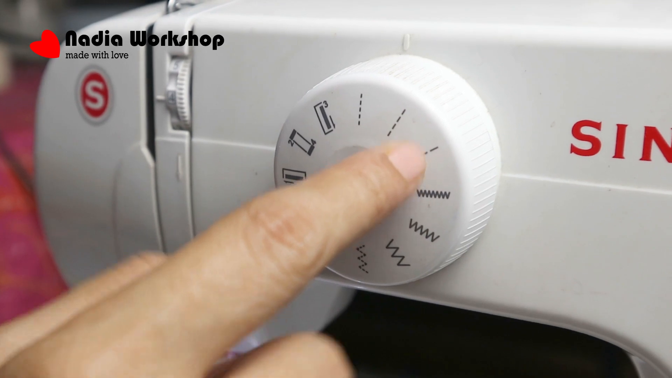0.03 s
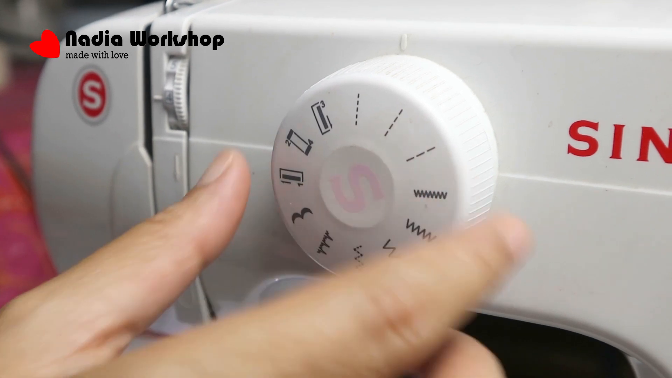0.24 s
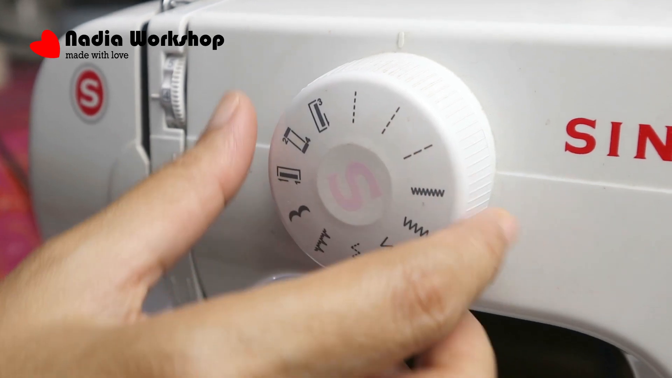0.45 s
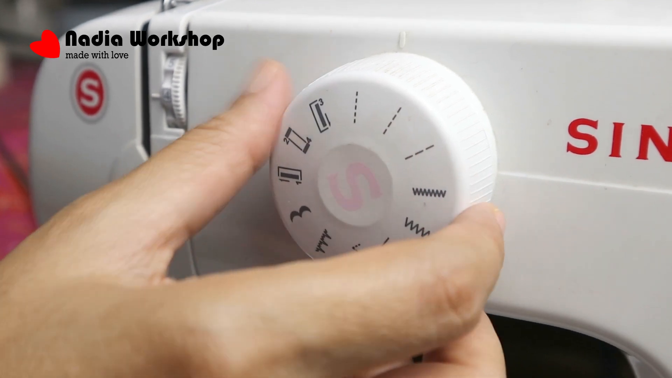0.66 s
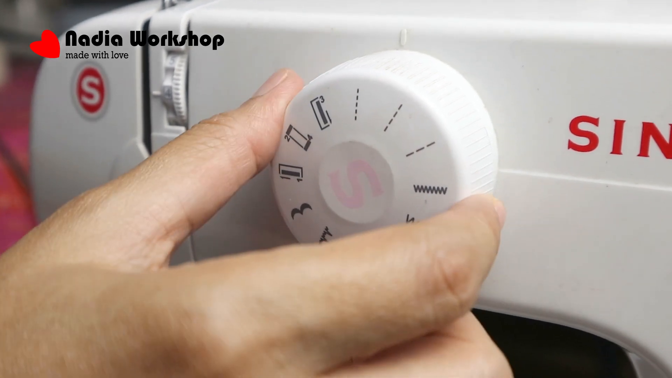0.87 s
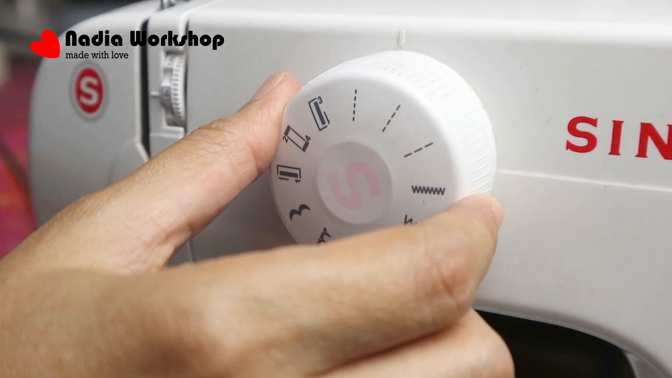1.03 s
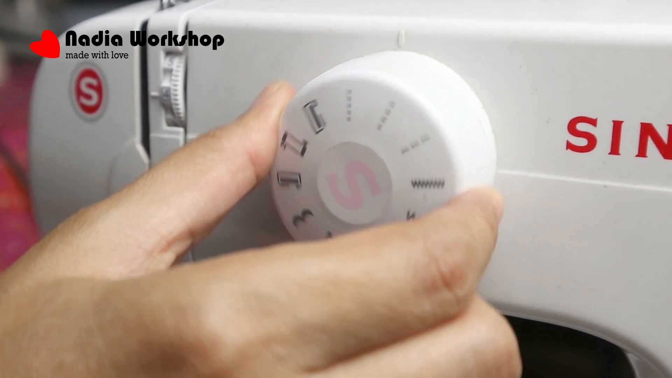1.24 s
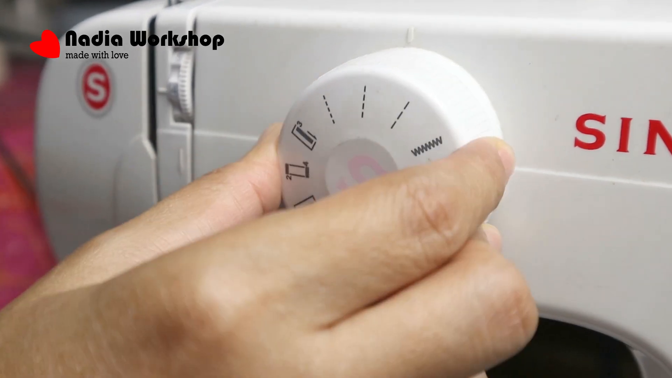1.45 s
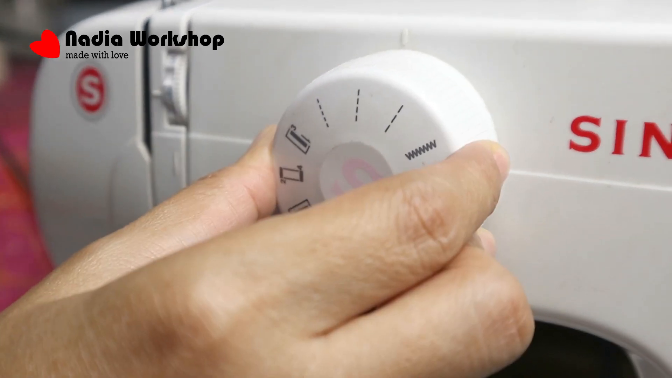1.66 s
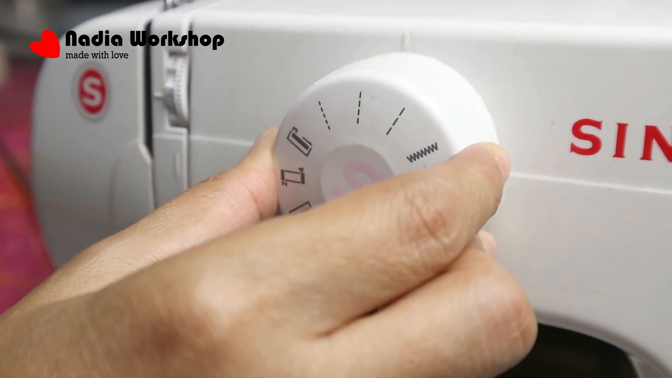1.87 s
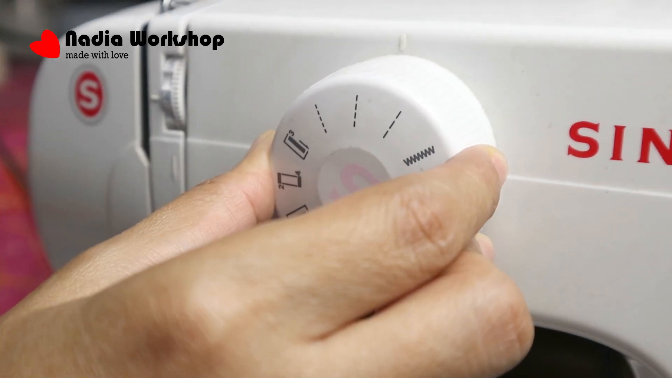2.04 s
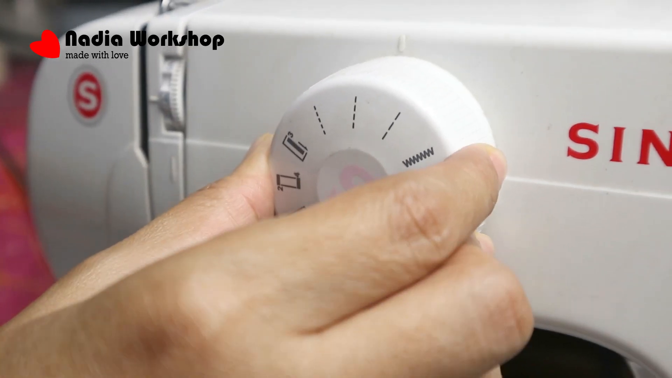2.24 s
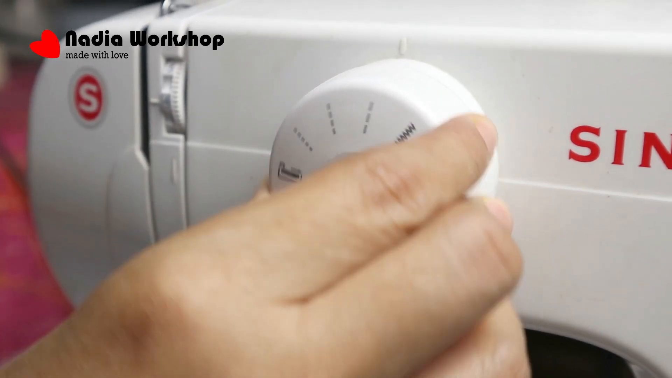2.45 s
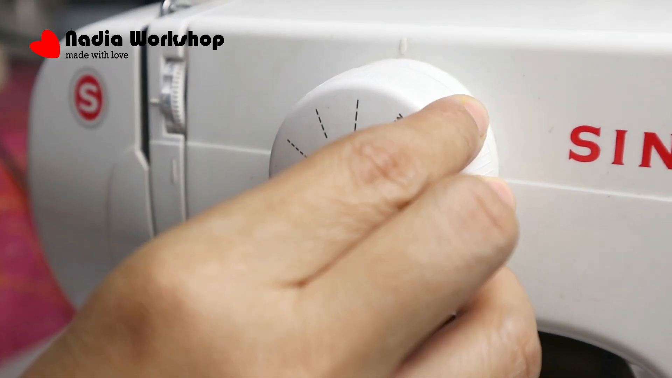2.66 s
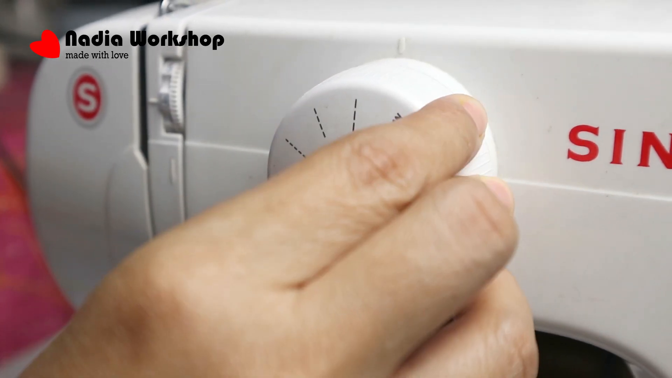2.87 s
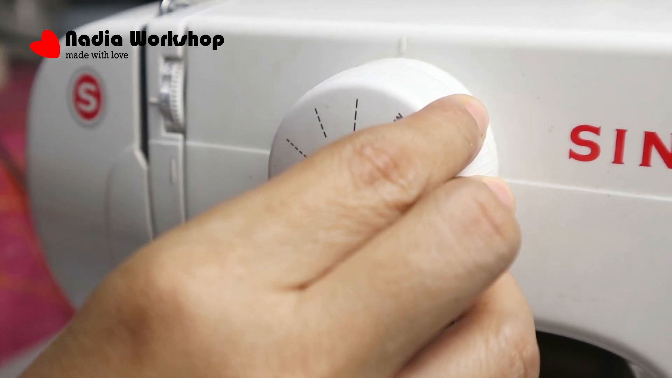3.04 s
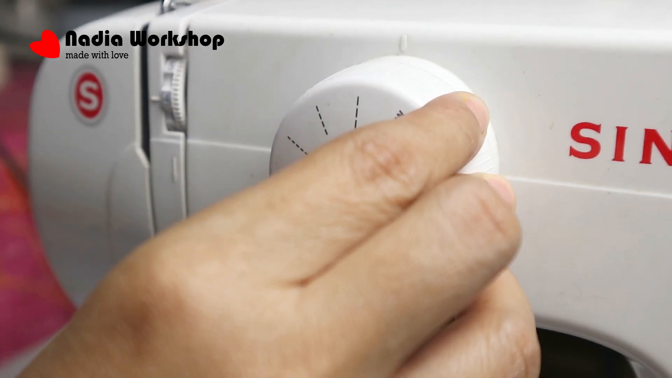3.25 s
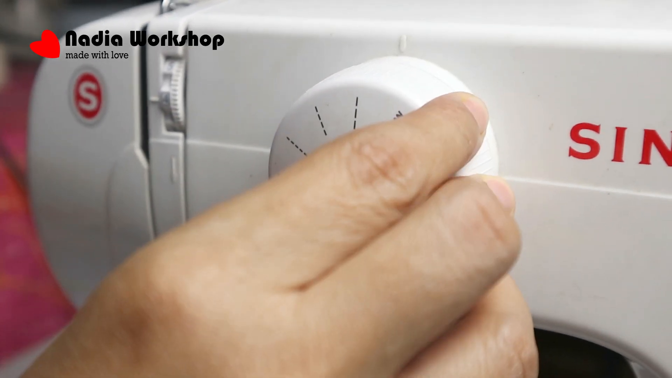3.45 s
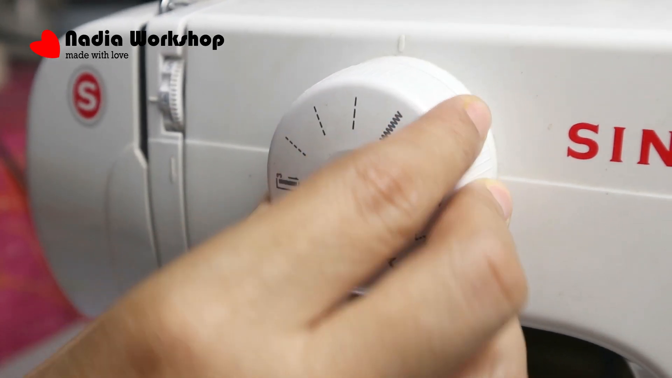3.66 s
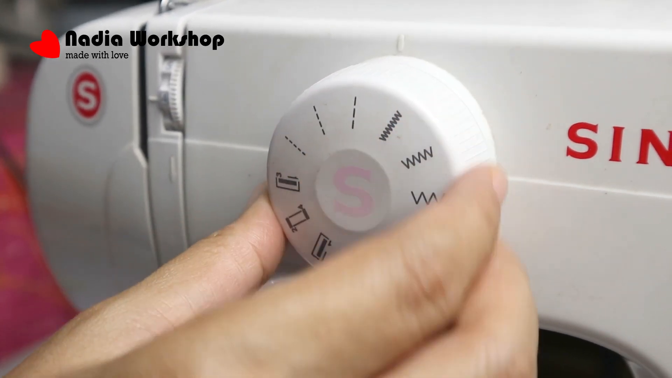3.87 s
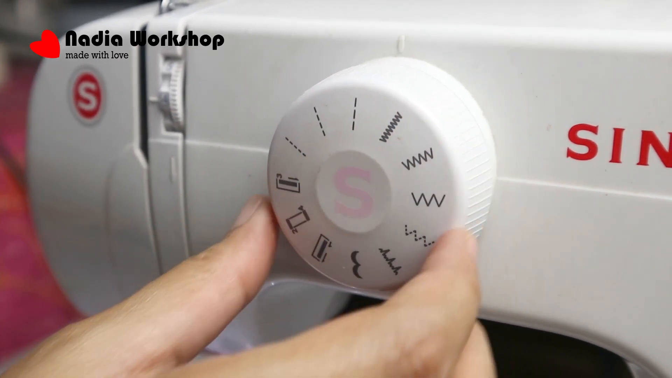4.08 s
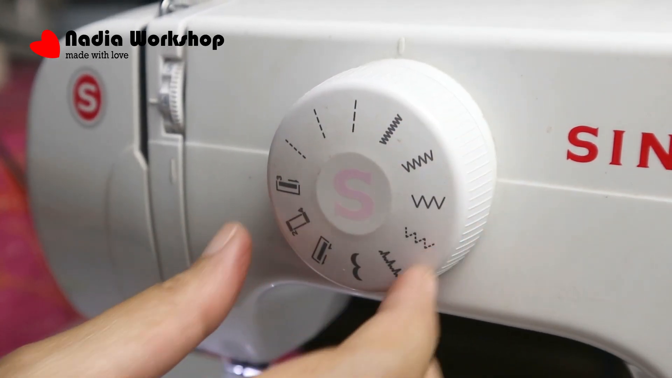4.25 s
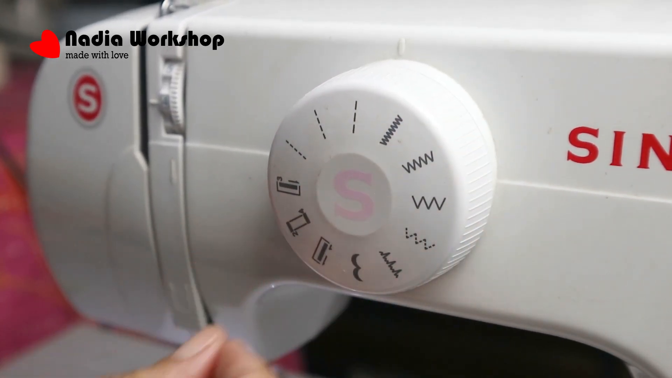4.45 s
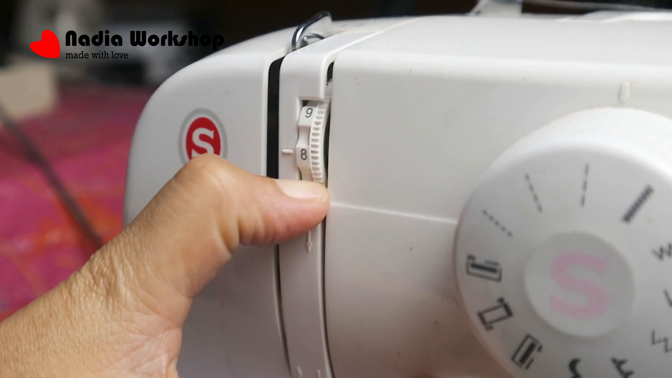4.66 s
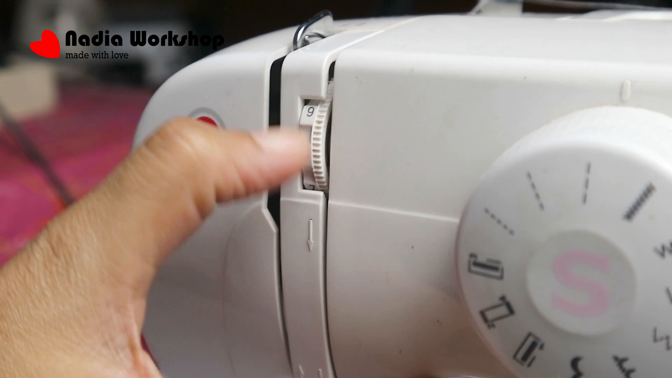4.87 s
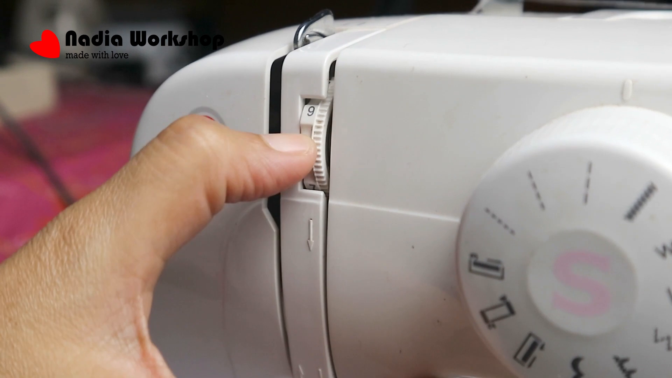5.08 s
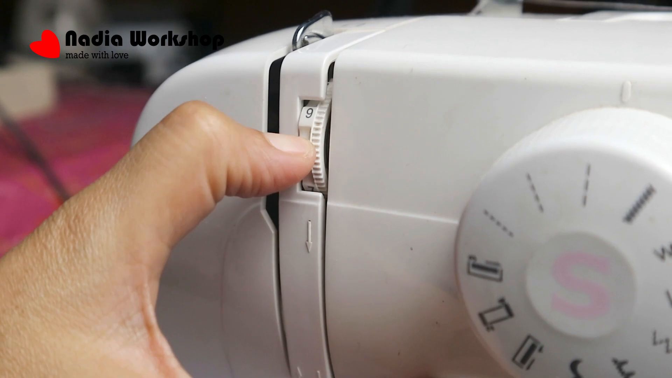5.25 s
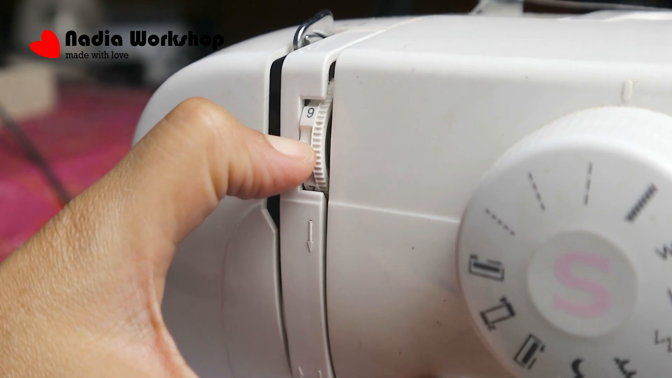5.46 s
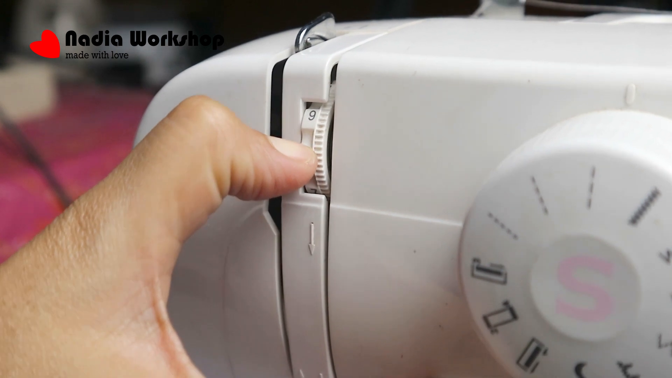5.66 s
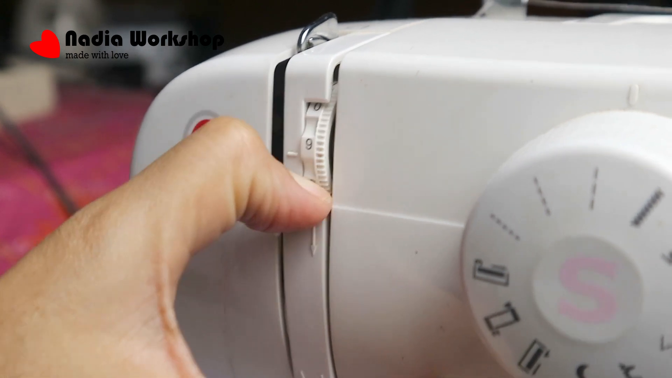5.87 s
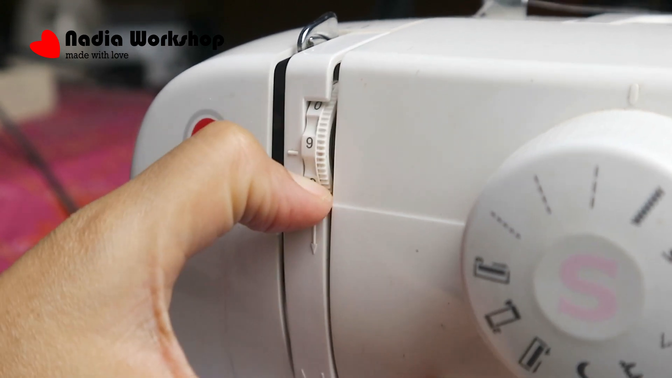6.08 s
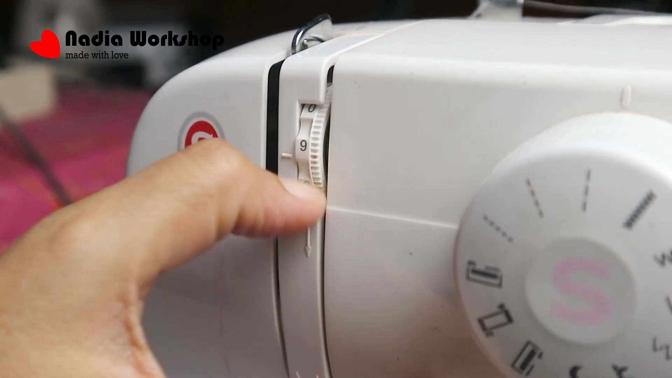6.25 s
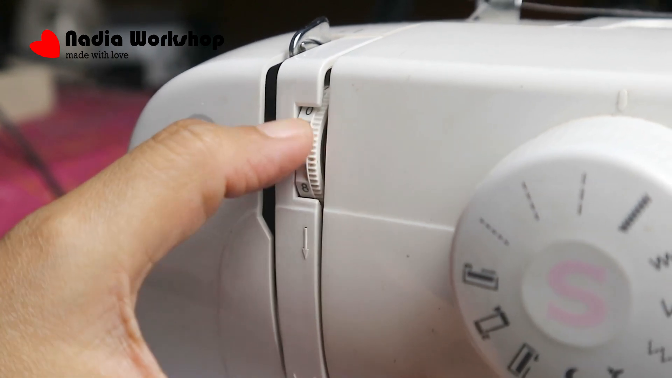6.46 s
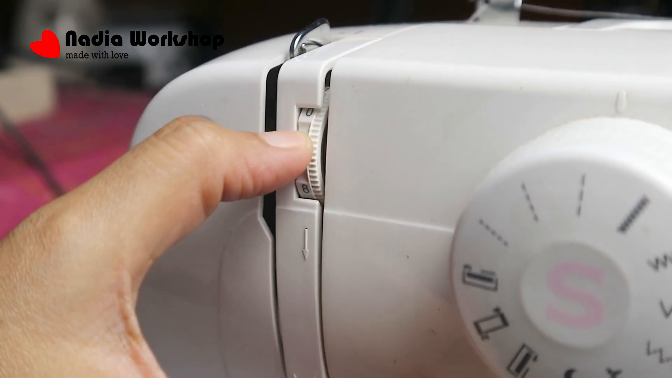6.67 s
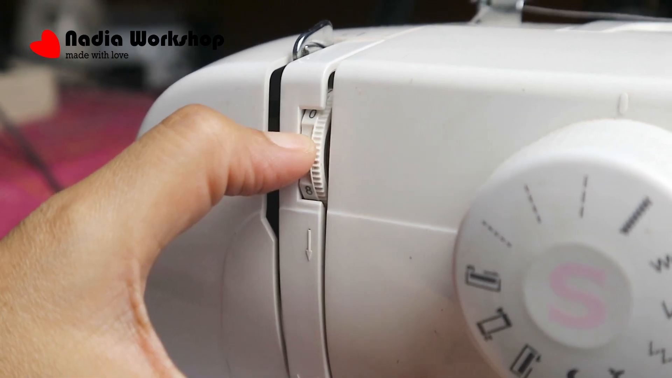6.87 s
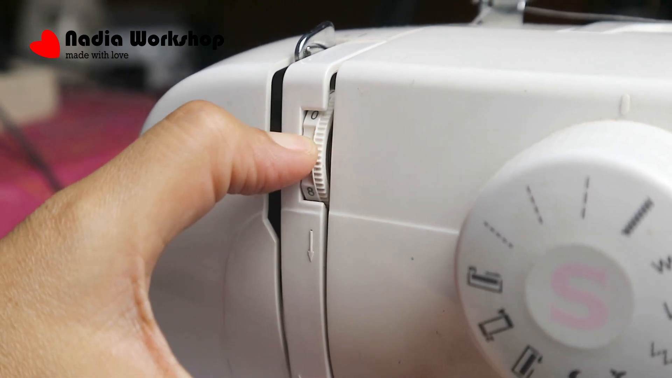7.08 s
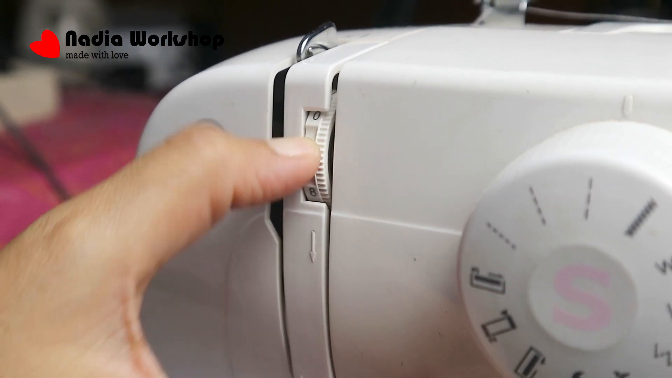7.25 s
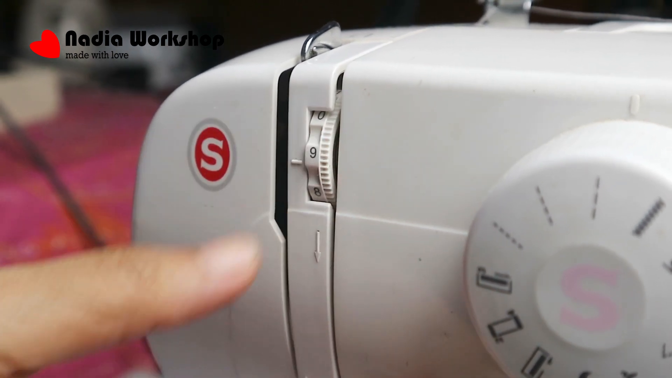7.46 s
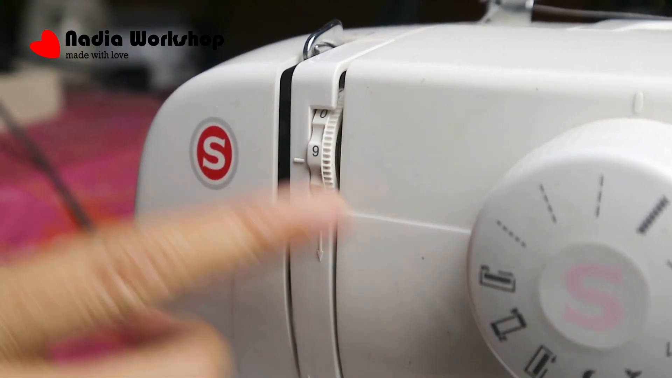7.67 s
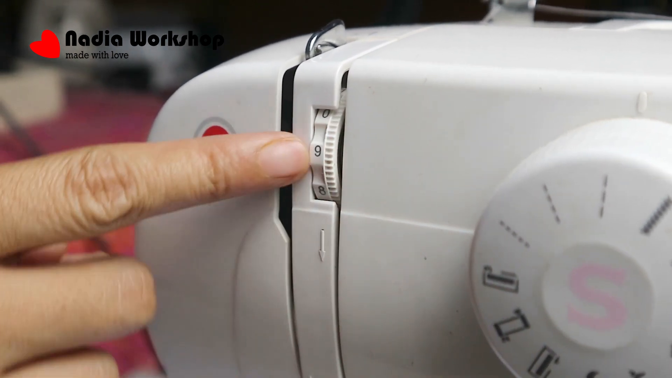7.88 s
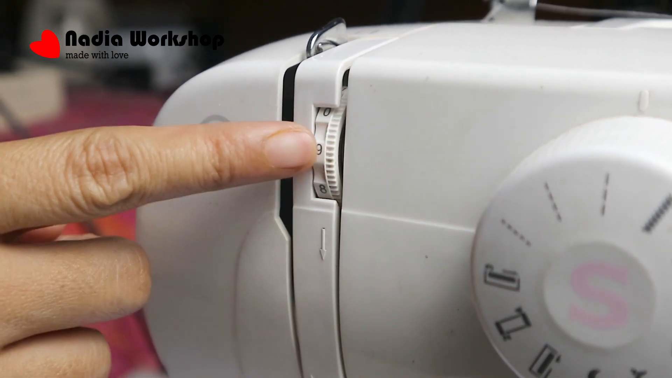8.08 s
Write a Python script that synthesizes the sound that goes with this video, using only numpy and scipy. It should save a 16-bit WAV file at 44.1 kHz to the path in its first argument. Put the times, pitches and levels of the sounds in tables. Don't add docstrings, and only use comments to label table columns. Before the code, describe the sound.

Indoors, close stereo: low uneven rumble, airy hiss and a faint wavering fan hum, with irregular tiny ticks about sixteen times a second. A soft finger tap comes at 0.3 s. A light knock at 1.36 leads to a sharp plastic detent snap at 1.52, with a quick rebound and hollow ring. Soft knocks at 2.2 and 2.48 precede the loudest snap at 2.61, fuller and brighter, pinging and booming briefly. Small release knocks fall at 3.82, 3.95 and 4.11. At 4.62 the background abruptly becomes quieter and duller; a distant engine drones low until about 5.2. A thumb rubs and clicks a ribbed wheel at 4.9, with a light clack at 5.43. From 5.88 to 6.0 it clatters in a rapid hard burst. Faint rib clicks and dull rubs continue, clustered around 6.7-7.2, ending with a small tap at 7.54 and room tone to about 8.

```python
import sys
import numpy as np
from scipy import signal
from scipy.fft import rfft, irfft, next_fast_len
from scipy.io import wavfile
from scipy.ndimage import uniform_filter1d

SR = 44100
rng = np.random.default_rng(int(sys.argv[2]) if len(sys.argv) > 2 else 0)


def log_audio(samples):
    frames = np.atleast_2d(samples).T
    limited = np.clip(frames, -1, 1)
    pcm = np.round(limited * 32767).astype(np.int16)
    wavfile.write(sys.argv[1], SR, pcm)


def voltage_ratio(decibels):
    exponent = np.asarray(decibels, float) / 20
    return 10 ** exponent


N = 358091
CUT_S, SECOND_GAIN_DB = 4.619, -10

# (frequency [Hz], T60 [s], first snap level [dB], second snap level [dB], light knock level [dB])
DIAL_MODES = [(244, 0.18, -3, -11.5, -4.5), (296.3, 0.12, 6, 6, -0.5), (329, 0.15, -4.5, 4, 3),
              (399.2, 0.25, -5.5, -6, -19.5), (447, 0.22, -11, -9.5, -14.5), (551, 0.19, -21, 3.5, 0),
              (637, .16, -9, -8.5, -5), (697, 0.24, -1, -4, -1), (756, 0.18, -35, -1, -2.5),
              (812, 0.17, 4, -4.5, -3.5), (933, .14, 7, -9, -3), (1092, 0.091, 5.5, 4, -12),
              (1152, 0.12, 2, -2.5, -6), (1470, 0.11, -26, -1.5, -4), (1814, 0.096, 5, 13.5, 8),
              (2170, 0.094, 5, 5, 3.5), (2402, 0.031, -17, -14.5, -4), (2660, 0.022, 8.5, -9, -10),
              (3120, 0.04, 8, -1, -9), (3630, 0.043, 5, 2.5, 0.5), (4250, 0.074, -2, -3.5, -6.5),
              (4680, 0.087, -6, -16.5, -12.5), (5450, 0.039, -6.5, 0, -7.5),
              (6360, 0.033, -0.5, -14, -25.5)]
# (frequency [Hz], T60 [s], clack level [dB], rib click level [dB])
WHEEL_MODES = [(294, 0.09, -4, -4), (336, 0.1, 1, 6.5), (402, 0.18, -3.5, -3), (555.7, 0.26, -4, -2),
               (632.7, 0.37, 1.5, -8), (773, 0.079, 5.5, 2.5), (852, 0.064, 7.5, 5.5),
               (887, 0.11, -1.5, -3.5), (1197, 0.17, -7, -7), (1637, 0.156, 7, -2), (1693, 0.12, 14, -11),
               (2540, .1, -10, -20), (3020, 0.043, -10, -32), (3280, 0.094, -10, -22),
               (3530, 0.052, 19, -2), (4590, 0.073, 16, 4), (4760, 0.052, -6, -24), (6290, 0.017, -23, -29)]
HARDNESS = {"first": (1.5, 0, 3, 1.5, 16), "second": (-4.5, 0.17, 0.5, 1, -1),
            "knock": (-.2, 0.52, -0.1, 1, -.3), "clack": (-5.5, 0.45, 5.5, 2.5, 17),
            "rib": (-2, 1, -19.5, 1, 0)}


def band(x, lo_hz, hi_hz, order=2):
    return signal.sosfilt(signal.butter(order, [lo_hz, hi_hz], "bandpass", fs=SR, output="sos"), x)


def ring(modes, t, signs=1, stretch=1):
    hz, db, t60_s = np.array(modes).T[:, :, None]
    z = voltage_ratio(db - 60 * t / (t60_s * stretch)) * np.exp(2j * np.pi * hz * t)
    return np.array([np.sum(signs * z.imag, axis=0), np.sum(z.real, axis=0)])


def add(out, s, sound):
    i = int(s * SR)
    out[:, i:i + sound.shape[1]] += sound[:, :out.shape[1] - i]


def walk(rate_hz):
    k = int(SR / rate_hz)
    held = np.repeat(rng.standard_normal(N // k + 1), k)
    return 1.3 * uniform_filter1d(uniform_filter1d(held, k), k)[:N]


def tone(hz, db):
    turns = np.cumsum(hz + np.zeros(N)) / SR + rng.random()
    return np.sqrt(2) * voltage_ratio(db) * np.sin(2 * np.pi * turns)


def air(spectrum, db, flicker_db):
    size = next_fast_len(N)
    hz = np.fft.rfftfreq(size, 1 / SR) + 1
    point_hz, point_db = np.transpose(spectrum)
    shape = rfft(rng.standard_normal(size)) * voltage_ratio(np.interp(np.log(hz), np.log(point_hz), point_db))
    octave = np.log2(hz / 30).clip(0, 9)
    parts = [irfft(shape * (1 - np.abs(octave - k)).clip(0), size)[:N] for k in range(10)]
    scale = voltage_ratio(db) / sum(parts).std()
    return [scale * part * voltage_ratio(flicker_db * (1 - k / 9) * walk(9.3)) for k, part in enumerate(parts)]


def traffic_swell(t):
    # (time [s], level [dB])
    rumble = [(0, -3), (1.2, -1.5), (2.2, -2), (3.3, -0.5), (4.61, 0.5), (4.63, 5), (4.75, 1), (5.11, 2.5),
              (5.67, -0.5), (7.0, -2), (7.33, 0), (7.72, -3.5), (8.12, -4)]
    # (time [s], level over the rumble [dB])
    shakes = [
        (1.521, 1.7),
        (2.48, 2.4),
        (2.61, 2.5),
        (5.93, 7.5),
    ]
    shake = sum((t > s) * voltage_ratio(db) * np.exp(-np.abs(t - s) / 0.094) for s, db in shakes)
    return voltage_ratio(np.interp(t, *np.transpose(rumble)) + 0.99 * walk(4.9)) * (1 + shake)


def fan_hum():
    # (frequency [Hz], level [dB])
    harmonics = [(145.3, -59), (188.4, -60.5), (339.1, -61), (387.6, -62.5), (484.5, -71), (629.8, -70),
                 (721.4, -70.5), (769.8, -64), (915.2, -66), (963.6, -72), (1109, -71.5)]
    return np.array([tone(hz * (1 + 0.00402 * walk(12)), db - 1.0 + 1.9 * walk(18)) for hz, db in harmonics])


def room():
    # (frequency [Hz], density [dB per Hz])
    first_mid = [(12, -40.5), (20, -13.5), (55, 1.5), (141, 0.5), (300, -7.5), (386, -9), (586, -16),
                 (765, -13.5), (850, -15.5), (2370, -22), (9500, -35.5), (10300, -42), (12600, -38.5),
                 (15800, -89)]
    second_mid = [(12, -60), (20, -7.5), (54, -0.5), (107, -4), (141, 0), (299, -9), (339, -10),
                  (427, -14.5), (752, -17.5), (1010, -19), (3000, -26), (3900, -30), (6600, -120)]
    left_minus_right = [(12, -53.5), (20, -25.5), (53, -20), (145, -2), (469, 0.5), (539, -5), (819, -6),
                        (996, -6.5), (2300, -9.5), (2720, -9), (3310, -11), (7640, -20), (10400, -20.5),
                        (15800, -30.5)]
    t = np.arange(N) / SR
    first = t < CUT_S
    gain = np.where(first, 1, voltage_ratio(SECOND_GAIN_DB))
    one, two = air(first_mid, -48, 1.0), air(second_mid, -56.5, 2.1)
    lows = [np.where(first, a, b) for a, b in zip(one[:7], two[:7])]
    hiss = [gain * a for a in one[7:]]
    mid = traffic_swell(t) * sum(lows[:4]) + sum(lows[4:]) + sum(hiss)
    hum = fan_hum()
    side = sum(air(left_minus_right, -51, 0.6)) + voltage_ratio(-13.5) * rng.choice([-1, 1], len(hum)) @ hum
    return np.array([mid + gain * hum.sum(axis=0), gain * side])


def fan_ticks():
    # (time [s], level [dB])
    first_taps = [(0.849, -53), (0.9742, -58), (1.1218, -61), (1.2391, -59), (1.2725, -55), (1.7, -49),
                  (1.8806, -53), (2.0283, -49), (2.0572, -49), (2.148, -49), (2.1859, -52), (2.277, -48.5),
                  (2.3974, -50), (2.433, -50), (2.7292, -48), (2.8559, -50), (2.9238, -53), (3.132, -50),
                  (3.3712, -46.5), (3.478, -58), (4.2921, -62), (4.3455, -56), (4.5022, -62)]
    second_taps = [(4.6399, -61), (4.6857, -59), (4.7476, -60), (4.81, -60), (4.8983, -57), (4.9352, -63),
                   (5.024, -61), (5.0599, -58.5), (5.232, -60), (5.2679, -64), (5.3308, -61.5),
                   (5.4006, -60), (5.4784, -59), (5.5588, -65), (5.5902, -60.5), (5.6441, -59),
                   (5.7089, -66), (5.7688, -61.5), (5.8346, -60), (6.0831, -56), (6.1509, -58),
                   (6.2153, -62.5), (6.2696, -58), (6.334, -58), (6.3949, -59), (6.4393, -59),
                   (6.4597, -60), (6.5201, -59), (6.5849, -57), (6.6448, -59), (6.7111, -59),
                   (6.7705, -57.5), (6.836, -58), (6.9012, -56.5), (6.9671, -61), (7.0199, -62),
                   (7.0594, -61), (7.1064, -57), (7.1581, -60)]
    # (frequency [Hz], level [dB], T60 [s])
    tap_modes = [(2370, -0.5, 0.041), (2480, 1.5, 0.018), (3056, -3, 0.021), (3870, -5.5, 0.014)]
    out, t = np.zeros((2, N)), np.arange(SR // 20) / SR
    faint_s = np.sort(rng.random(200)) * (N / SR)
    faint_db = -60 + 3 * rng.standard_normal(200) + SECOND_GAIN_DB * (faint_s > CUT_S)
    for s, db in first_taps + second_taps + list(zip(faint_s, faint_db)):
        modes = np.array(tap_modes) + rng.standard_normal((len(tap_modes), 1)) * [45, 0, 0]
        modes[:, 1] += 2.1 * rng.standard_normal(len(modes))
        add(out, s, voltage_ratio(db + np.array([[1.5], [-7]])) * ring(modes, t) * (1 - np.exp(-t / 0.0011)))
    return out


def hits(events, body, column, edge, softness, chatter_s, blur_db, spit_db, spit_hz):
    # (low [Hz], high [Hz], swell [s], crack level [dB], crack T60 [s],
    # dense ring level [dB], dense ring T60 [s], side level [dB])
    case_bands = [(463.7, 1190, 0.0021, -6.5, 0.031, -10, 0.25, -24.5),
                  (225, 554, 0.011, -12.5, 0.033, -1.5, 0.2, -23.5),
                  (1298, 3240, 0.0029, 0.5, 0.041, -7, 0.28, -14.5),
                  (3240, 6680, 0.0019, 8.5, 0.0099, -16.5, 0.34, -5)]
    upper_db, upper_share, top_db, top_share, spit_share = edge
    out, t = np.zeros((2, N)), np.arange(SR // 4) / SR
    modes = [(mode[0], mode[column], mode[1]) for mode in body]
    for s, level_db, thud_db, hard_db, stretch in events:
        upper = upper_db + upper_share * hard_db
        top = top_db + top_share * hard_db
        levels_db = level_db + np.array([0, thud_db, upper, top])
        noise = rng.standard_normal((2, len(t)))
        bounce_time, bounce_force = rng.random((2, 5))
        blows = np.zeros(SR // 30)
        blows[(bounce_time * chatter_s * SR).astype(int).clip(1, len(blows) - 1)] = 0.72 * (2 * bounce_force - 1)
        blows[0] = 0.77
        signs = np.where(np.array(modes)[:, :1] < 500, 1, rng.choice([-1., 1.], (len(modes), 1)))
        single = ring(modes, t, signs, stretch)
        chatter = signal.fftconvolve(single, blows[None])[:, :len(t)]
        drives = single, single, chatter, chatter
        for db, clear, case_band in zip(levels_db, drives, case_bands):
            lo_hz, hi_hz, swell_s, crack_db, crack_t60_s, dense_db, dense_t60_s, side_db = case_band
            rise = 1 - np.exp(-t / (swell_s * softness))
            tones = band(clear * rise, lo_hz, hi_hz, order=3)
            blur = band(noise, lo_hz, hi_hz, order=3)
            crack = voltage_ratio(crack_db - 60 * t / crack_t60_s)
            dense = voltage_ratio(dense_db - 60 * t / (dense_t60_s * stretch))
            blur = blur / blur.std() * (crack + dense) * rise * voltage_ratio(blur_db)
            part = tones / np.abs(tones[0]).max() + blur
            peak = np.sqrt(uniform_filter1d(part[0] ** 2, size=256).max())
            add(out, s, part / peak * voltage_ratio(db + np.array([[0], [side_db]])))
        fade = voltage_ratio(-60 * t / 0.018) + voltage_ratio(-23.5 - 60 * t / (0.12 * stretch))
        spit = band(noise, 6500, spit_hz, order=3) * fade * (1 - np.exp(-t / 0.001))
        add(out, s, spit * voltage_ratio(levels_db[-1] + spit_db + spit_share * hard_db))
    return out


def dial_knocks():
    # (time [s], level [dB], panel thud [dB], hardness [dB], ring length factor)
    knocks = [(.280, -48.5, 1.5, -13, .6), (.292, -49, -10, -13, 1.2), (1.363, -29.5, -1, -14, 1.3),
              (1.514, -55, 0, -1, 1.5), (2.156, -60.5, 15, -3, 0.17), (2.202, -43.5, 0.5, -10.5, 0.48),
              (2.220, -44, 2, -9.5, 0.96), (2.468, -48, -23, -7.5, 0.9), (2.476, -33, 7.5, -22, 0.68),
              (2.484, -27, -1.5, -22, 0.99), (2.601, -46, 0, -8, 1.1), (3.822, -38, 1, -17.5, 0.4),
              (3.842, -47, 12.5, -27.5, 0.43), (3.9275, -45.5, -3, 2.5, 0.48), (3.961, -48, 8, -13, 1.8),
              (4.1055, -41.5, -19, -4, 0.76), (4.128, -45.5, 5.5, -26, 0.66), (7.539, -48, -8, -10, 0.82)]
    return hits(knocks, DIAL_MODES, 4, HARDNESS["knock"], softness=0.83, chatter_s=0.005,
                blur_db=-1.3, spit_db=-14.5, spit_hz=12800)


def part_rings(table, swell_s, rough_db, side_db):
    out, t = np.zeros((2, N)), np.arange(SR // 4) / SR
    for hz, t60_s, blows in table.values():
        cluster = [(hz * 0.992, 0, t60_s), (hz * 1.017, -5, t60_s), (hz * 0.965, -9, t60_s), (hz * 1.04, -11, t60_s)]
        chord = ring(cluster, t) * (1 - np.exp(-t / swell_s))
        for s, db in blows:
            shake = uniform_filter1d(rng.standard_normal(len(t)), size=int(8 * SR / hz))
            shake = uniform_filter1d(shake, size=int(4 * SR / hz))
            rough = voltage_ratio(rough_db * shake / shake.std())
            add(out, s, chord * rough * voltage_ratio(db + np.array([[0], [side_db]])))
    return out


def small_part_pings():
    small_parts = {"cam": (3075, 0.027, [(1.526, -15.5), (2.612, -11)]),
                   "pawl": (5480, 0.018, [(2.6115, -8.5)]), "catch": (5600, .1, [(2.474, -51),
                   (2.62, -37.5)]), "lever": (3905, 0.083, [(1.365, -40), (7.541, -58)]),
                   "link": (2190, .3, [(2.503, -49.5), (2.54, -52)]), "washer": (5280, 0.025, [(3.820, -46),
                   (3.929, -53), (4.1065, -49), (7.540, -54)]), "tab": (4900, 0.026, [(4.106, -40),
                   (1.525, -38)]), "pin": (7900, 0.014, [(3.823, -48), (4.106, -42.5)]),
                   "rim": (8100, .011, [(2.48, -48), (3.928, -32.5)]), "plate": (1400, 0.15, [(.281, -42),
                   (7.488, -60.5)]), "cover": (1530, 0.055, [(.306, -41), (4.112, -41), (4.125, -50),
                   (6.439, -49.5)]), "spring": (1715, 0.05, [(.293, -43), (5.929, -21), (5.94, -26),
                   (4.688, -55.5), (5.9, -57), (5.468, -56), (5.485, -61), (4.93, -55), (7.135, -54),
                   (4.888, -47.5), (4.905, -37), (6.698, -57), (6.957, -46), (7.001, -45), (7.111, -40)]),
                   "disc": (4000, 0.056, [(5.431, -49), (5.93, -29.5), (5.966, -42), (5.986, -39.5),
                   (2.611, -24), (7.539, -52)]), "shaft": (4900, 0.14, [(5.936, -40), (5.975, -44)]),
                   "knuckle": (265, 0.053, [(3.819, -37), (4.105, -38), (4.921, -47)]),
                   "shell": (555, .07, [(3.842, -37.5), (4.116, -42), (5.429, -42), (5.929, -26)]),
                   "guide": (2400, 0.083, [(7.53, -58), (7.541, -52), (7.57, -61)])}
    return part_rings(small_parts, swell_s=0.0019, rough_db=3.2, side_db=-11.5)


def noise_bursts():
    # (time [s], low [Hz], high [Hz], level [dB], T60 [s])
    bursts = [(1.364, 8000, 12000, -61, .025), (1.525, 9500, 14000, -56, .022),
              (2.610, 9000, 13070, -47, .025), (3.8195, 2000, 15510, -50, .02),
              (4.1055, 9000, 14500, -50, .02), (5.8835, 7030, 12200, -45.5, 0.033),
              (5.929, 9500, 15650, -50, .022), (7.540, 9000, 15000, -64, .03),
              (2.474, 5000, 7500, -51, .1), (2.602, 4500, 7470, -50.5, .1), (5.984, 1200, 2380, -41, 0.15),
              (5.915, 9000, 14000, -68, .1), (6.575, 3300, 4200, -66, .15), (1.545, 2300, 3400, -38, .28),
              (2.665, 2300, 3300, -42, .2), (5.89, 2900, 6000, -49, .15), (5.94, 4700, 8000, -54, .3),
              (.284, 600, 3000, -50, .12), (7.515, 2000, 5500, -62, .2), (7.015, 300, 600, -52, .15),
              (1.385, 300, 750, -40, .25), (6.14, 300, 600, -54, .12), (1.385, 3700, 4500, -55, .2)]
    out, t = np.zeros((2, N)), np.arange(SR // 8) / SR
    for s, lo_hz, hi_hz, db, t60_s in bursts:
        hiss = band(rng.standard_normal((2, len(t))), lo_hz, min(hi_hz, 0.45 * SR), order=4)
        fade = voltage_ratio(db - 60 * t / t60_s + np.array([[0], [-7]])) * (1 - np.exp(-t / 0.0012))
        add(out, s, hiss / hiss.std() * fade)
    return out


def panel_booms():
    panels = {"front": (400, 0.25, [(1.372, -34), (2.466, -35.5), (2.52, -36), (2.676, -32.5)]),
              "lid": (540, .15, [(1.39, -37)]), "bed": (148, 0.13, [(2.485, -30.5), (3.826, -35.5)]),
              "back": (329, 0.11, [(2.634, -18), (3.824, -31), (3.84, -32), (4.112, -34.5)]),
              "arm": (291, .15, [(2.225, -38), (3.959, -29), (3.98, -31), (4.912, -38.5), (6.14, -49.5)]),
              "table": (104, 0.11, [(3.965, -37), (4.915, -41.5), (6.318, -44)]),
              "base": (250, 0.2, [(6.443, -48.5), (1.558, -30), (2.64, -24.5)]),
              "side": (339, .1, [(4.915, -36), (5.436, -45.5), (7.01, -50)]),
              "head": (690, 0.22, [(5.4, -50), (7.13, -62)]), "cap": (750, 0.25, [(7.22, -51.5),
              (7.29, -54), (7.36, -57)])}
    return part_rings(panels, swell_s=0.011, rough_db=2.0, side_db=-21.5)


def dial_snaps():
    # (time [s], level [dB], panel thud [dB], hardness [dB], ring length factor)
    snaps = [
        (1.523, -21.5, 5.5, -4.5, 0.5),
        (1.546, -32, 6, -28, 1.03),
        (2.609, -12, 3, -13.5, 0.67),
        (2.631, -21, -1, -21.5, 1.13),
    ]
    first = hits(snaps[:2], DIAL_MODES, 2, HARDNESS["first"], softness=1.16, chatter_s=0.008,
                 blur_db=-3.0, spit_db=-41, spit_hz=8800)
    second = hits(snaps[2:], DIAL_MODES, 3, HARDNESS["second"], softness=0.97, chatter_s=0.0074,
                  blur_db=-2.7, spit_db=-32, spit_hz=9000)
    return first + second


def thumb_rubs():
    # (peak time [s], rise [s], fall [s], level [dB])
    drags = [
        (4.64, .06, 0.32, -55),
        (4.914, 0.048, 0.075, -35),
        (5.445, 0.11, 0.18, -44),
        (6.04, .03, 0.22, -47),
        (6.724, 0.057, .07, -50),
        (7.006, 0.11, 0.15, -47.5),
        (7.116, 0.044, 0.094, -53),
        (7.36, 0.41, 0.0606, -55.5),
        (7.548, 0.084, .072, -52.5),
    ]
    t = np.arange(N) / SR
    grains = (rng.random(N) < 250 / SR) * rng.standard_normal(N)
    modes = [(hz, db, t60_s) for hz, t60_s, _, db in WHEEL_MODES]
    body = ring(modes, t[:SR // 5], 0.99, 0.22) * np.array([[1], [voltage_ratio(-26)]])
    sound = band(signal.fftconvolve(grains[None], body)[:, :N], 250, 1650)
    push = sum(voltage_ratio(db - 40 * np.where(t < s, (s - t) / rise_s, (t - s) / fall_s)) for s, rise_s, fall_s, db in drags)
    return sound / sound[0].std() * push * voltage_ratio(-4.5)


def engine_drone():
    # (time [s], length [s], first pitch [Hz], last pitch [Hz], level [dB])
    pulls = [
        (4.692, 0.12, 183, 184.6, -51),
        (4.968, 0.27, 181.7, 181.7, -56),
    ]
    rise_db_s, fall_db_s = 300, 420
    out, t = np.zeros(N), np.arange(N) / SR
    for s, length_s, first_hz, last_hz, db in pulls:
        fade_db = rise_db_s * (s - t).clip(0) + fall_db_s * (t - s - length_s).clip(0)
        pitch_hz = np.interp(t, [s, s + length_s], [first_hz, last_hz])
        out += tone(pitch_hz, db - fade_db + 1.6 * walk(25))
    return np.array([out, np.zeros(N)])


def rib_clicks():
    # (time [s], level [dB], panel thud [dB], hardness [dB], ring length factor)
    ribs = [(4.889, -42, -9, -15.5, 0.65), (4.905, -46.5, 6, -5.5, 1), (4.995, -49, -2, -14, 0.28),
            (5.368, -50.5, -8, -15, 0.65), (5.69, -46, -8, -16, 0.61), (6.113, -49, 0, -11.5, 0.24),
            (6.127, -53.5, 3.5, -1, 0.73), (6.319, -58, 9.5, -16, 0.42), (6.444, -58.5, 5.5, 3, 0.46),
            (6.699, -60, -2, -1, 1), (6.902, -54.5, -7, -1, .33), (6.955, -47, -9, -13, 0.91),
            (7.0, -47.5, -24.5, -17, 0.71), (7.112, -41, -7, -9.5, 0.78), (7.134, -50, 1, -23, 0.88),
            (7.207, -50, -2, -24, 0.96)]
    return hits(ribs, WHEEL_MODES, 3, HARDNESS["rib"], softness=0.32, chatter_s=0.003,
                blur_db=-6.5, spit_db=-16.5, spit_hz=11000)


def wheel_clacks():
    # (time [s], level [dB], panel thud [dB], hardness [dB], ring length factor)
    clacks = [
        (5.430, -41, -15, -9, 0.81),
        (5.8835, -24, -8, -9.5, 1),
        (5.928, -20, 1, -10, 0.19),
        (5.932, -22.5, 2, -10.5, 0.78),
        (5.938, -20, 1.5, -27, 0.37),
        (5.956, -29, 7, -40, 0.45),
        (5.969, -29, -6, -20, 0.73),
        (5.987, -24.5, -2.5, -39, 0.54),
        (6.004, -32, -3.5, -33, 0.87),
    ]
    return hits(clacks, WHEEL_MODES, 2, HARDNESS["clack"], softness=0.48, chatter_s=0.006,
                blur_db=0.1, spit_db=-14, spit_hz=12500)


def scene():
    background = room() + fan_ticks() + engine_drone()
    dial = dial_knocks() + dial_snaps()
    wheel = thumb_rubs() + rib_clicks() + wheel_clacks()
    parts = small_part_pings() + noise_bursts() + panel_booms()
    mid, side = background + dial + wheel + parts
    return np.array([mid + side, mid - side])


def band_limit(x):
    return signal.sosfilt(signal.butter(12, 15940, fs=SR, output="sos"), x)


def record(dry):
    top = signal.ellip(8, 0.2, 70, 15800, fs=SR, output="sos")
    return band_limit(signal.sosfilt(top, dry))


dry = scene()
out = record(dry)
log_audio(out)
```